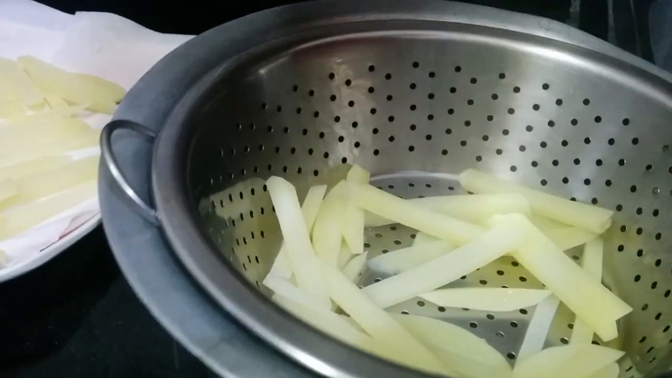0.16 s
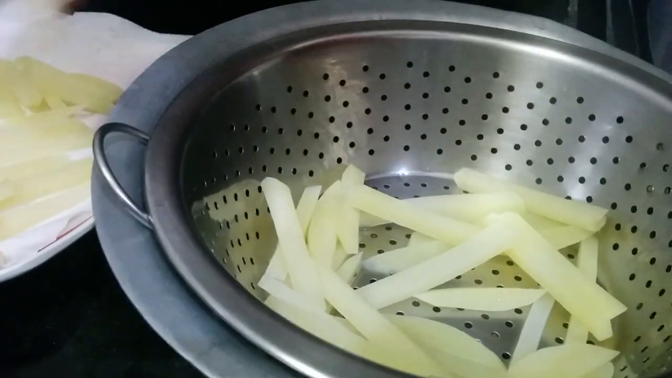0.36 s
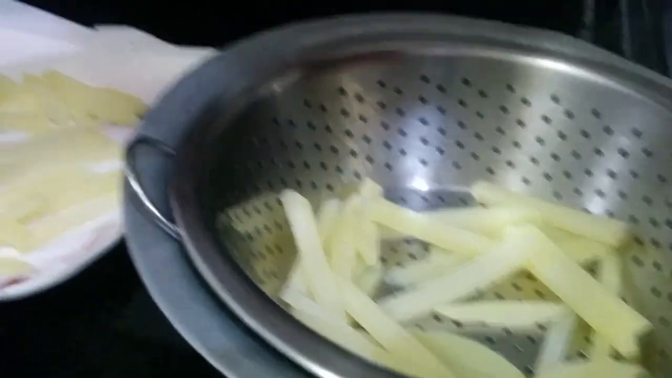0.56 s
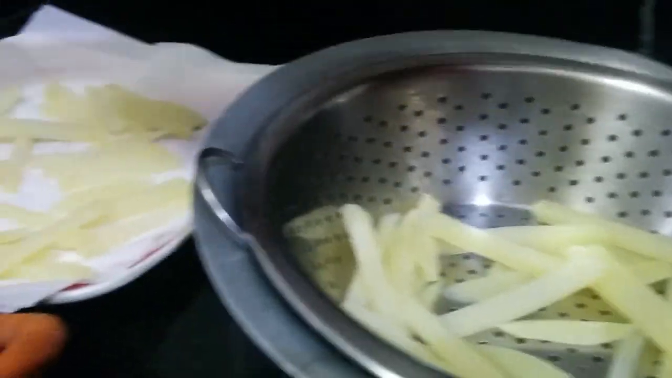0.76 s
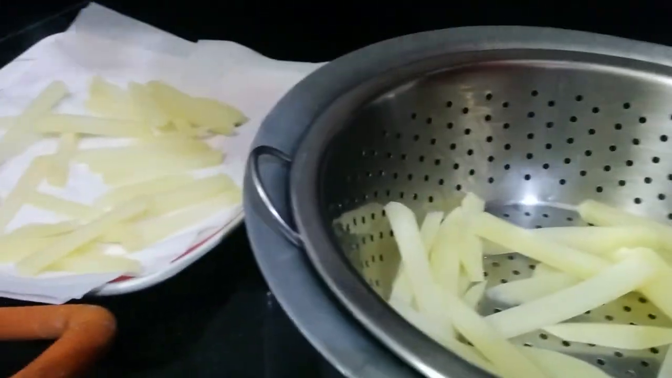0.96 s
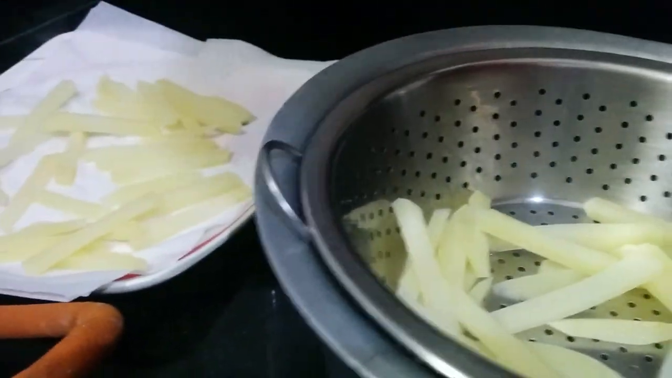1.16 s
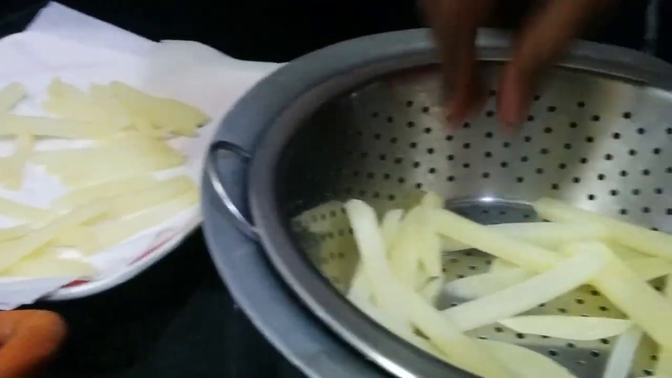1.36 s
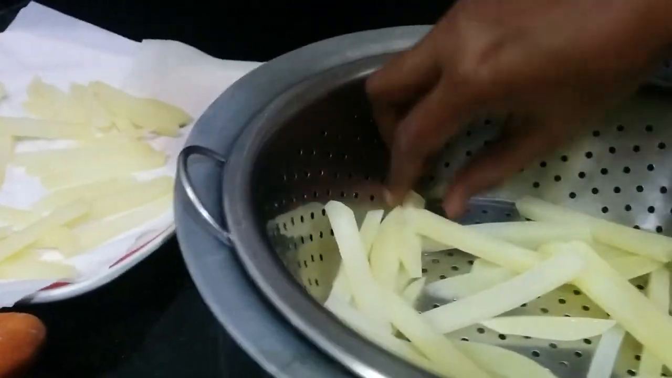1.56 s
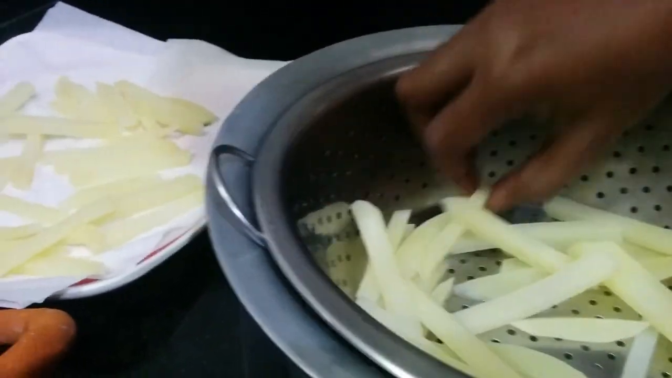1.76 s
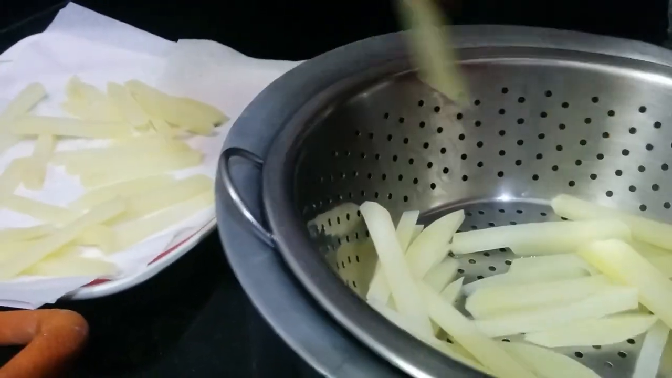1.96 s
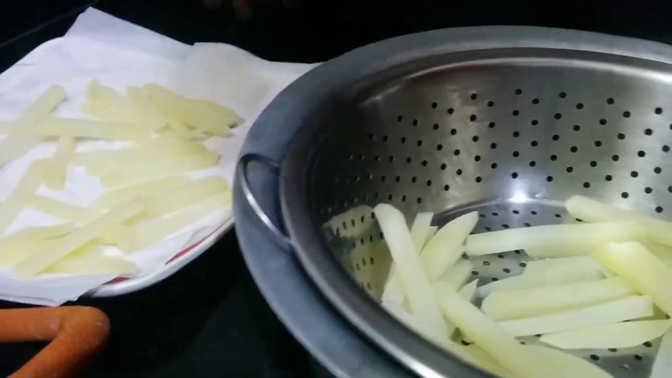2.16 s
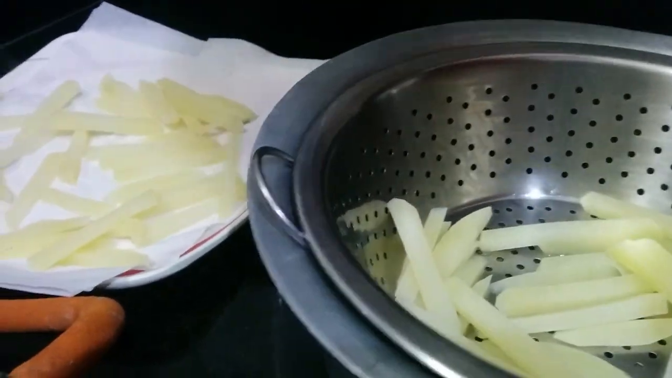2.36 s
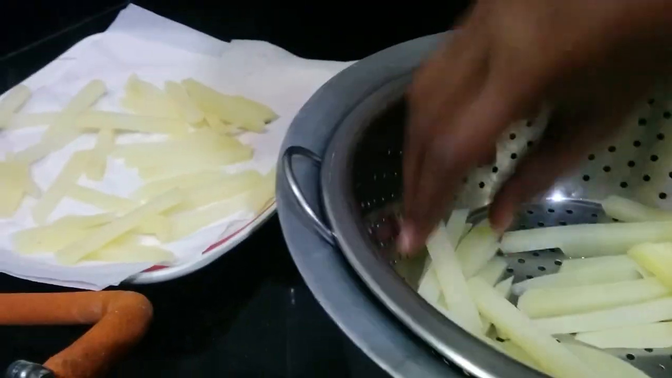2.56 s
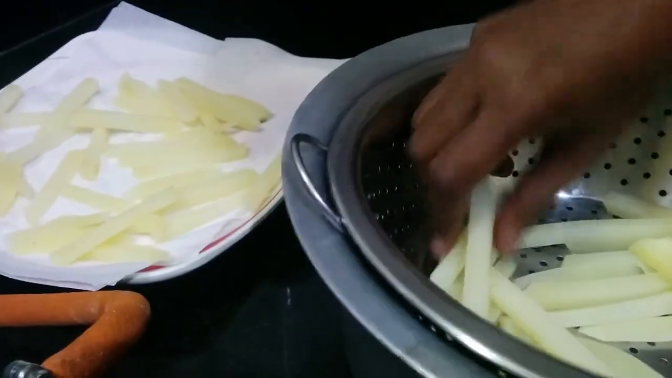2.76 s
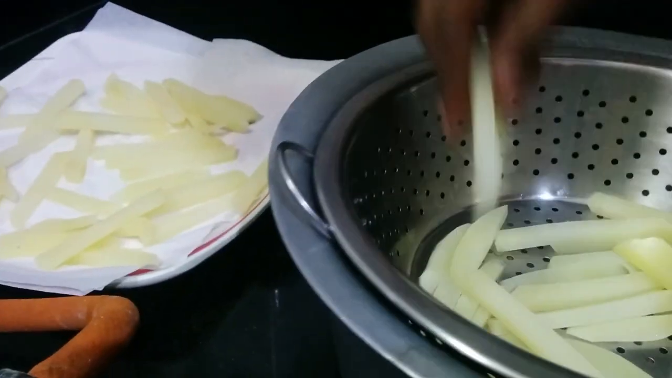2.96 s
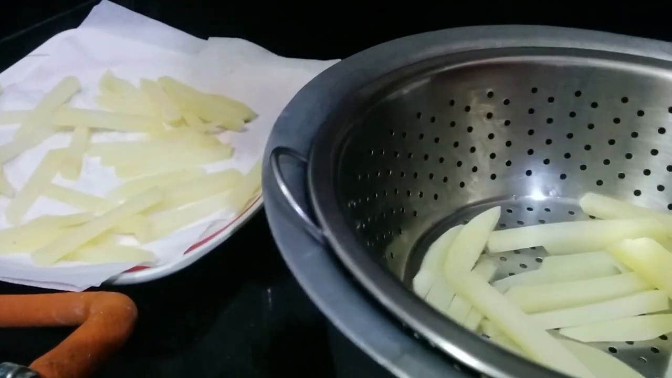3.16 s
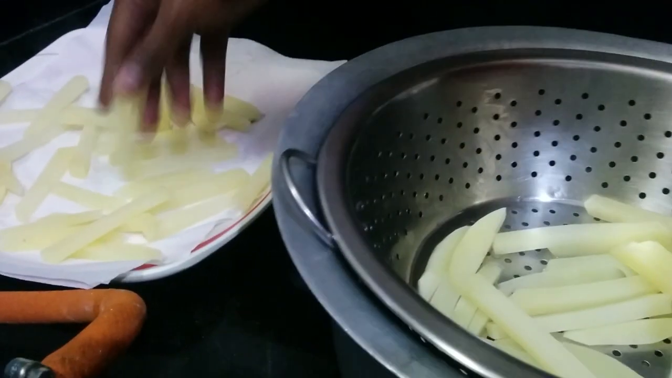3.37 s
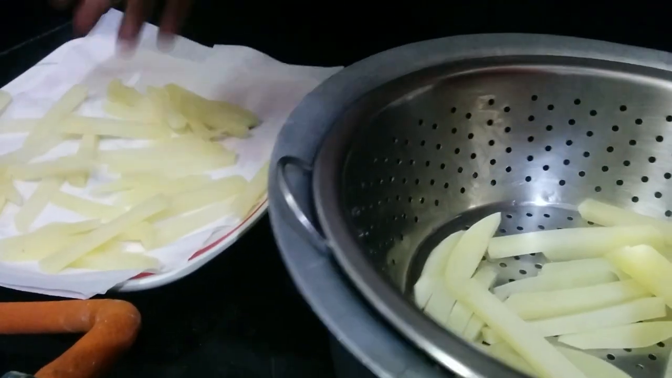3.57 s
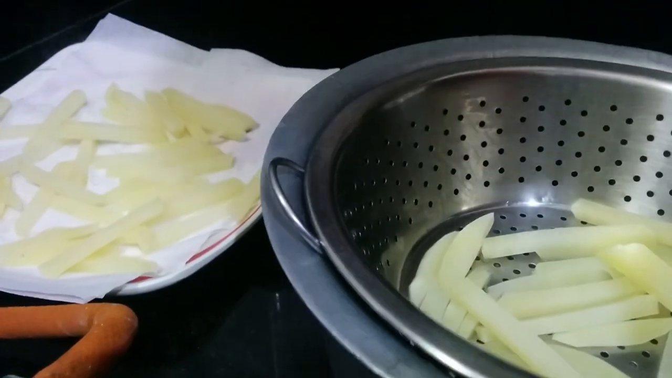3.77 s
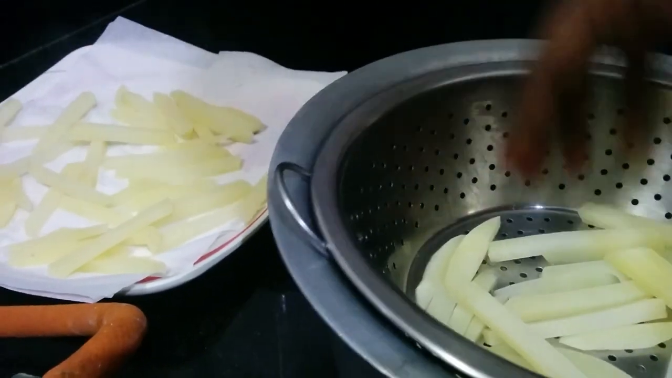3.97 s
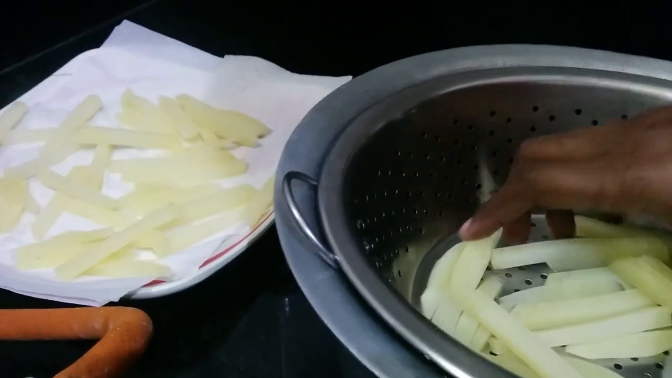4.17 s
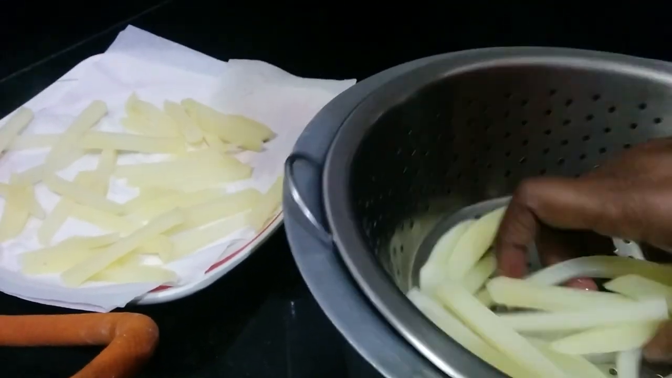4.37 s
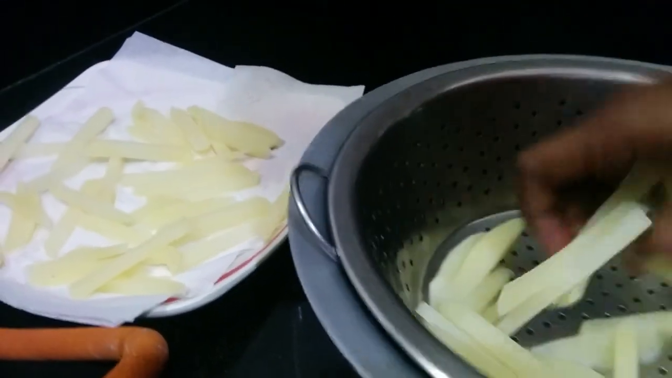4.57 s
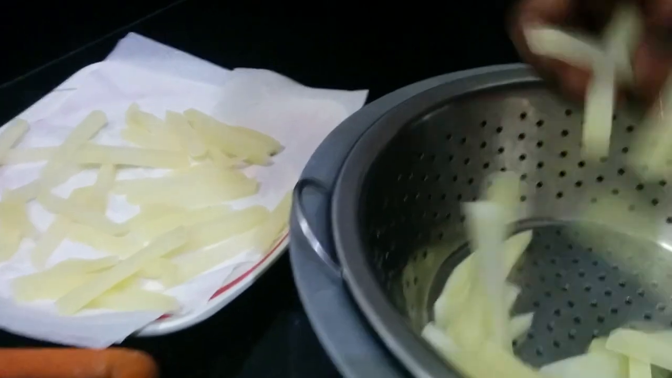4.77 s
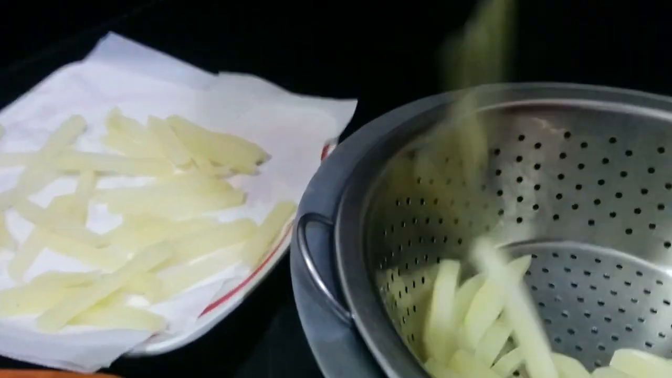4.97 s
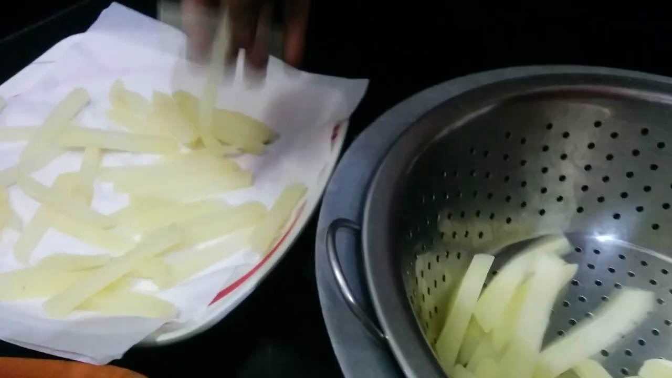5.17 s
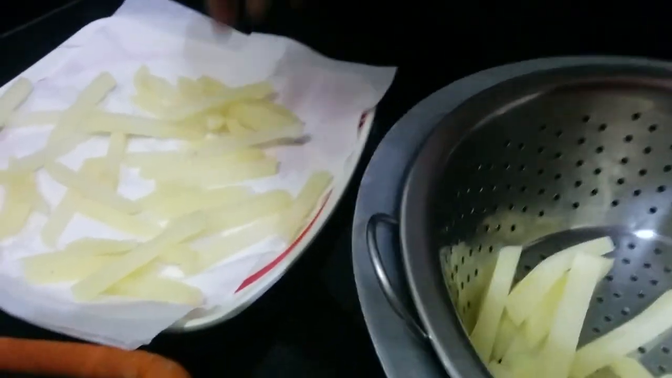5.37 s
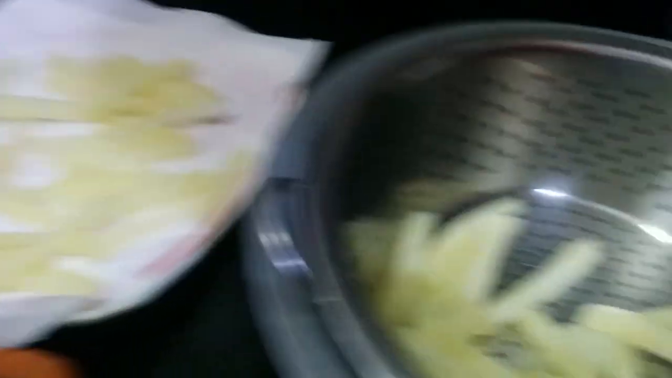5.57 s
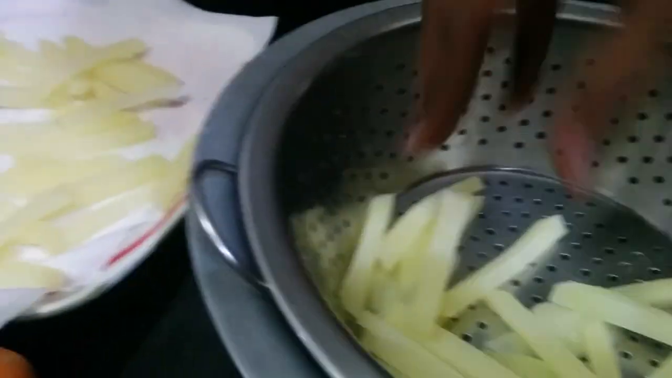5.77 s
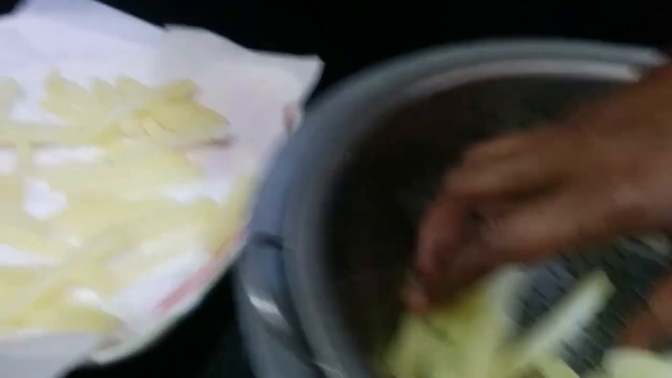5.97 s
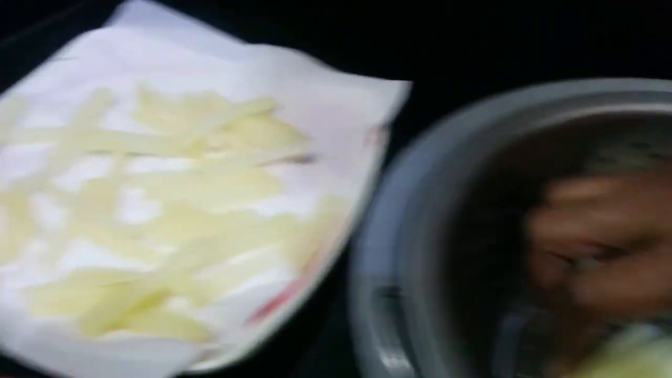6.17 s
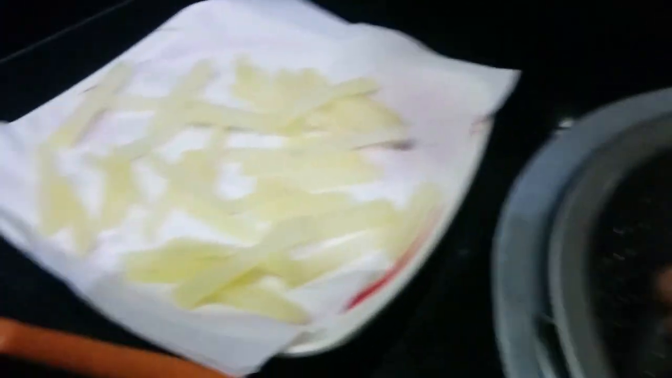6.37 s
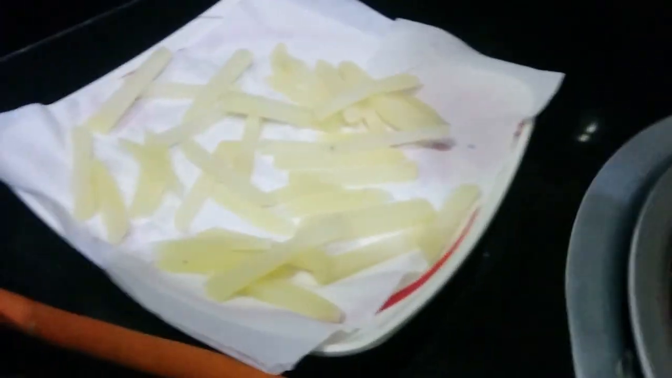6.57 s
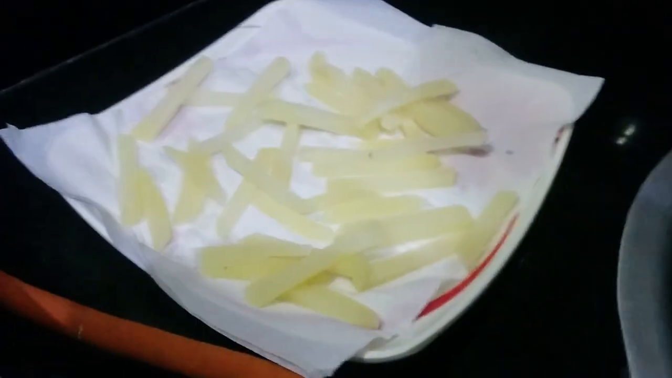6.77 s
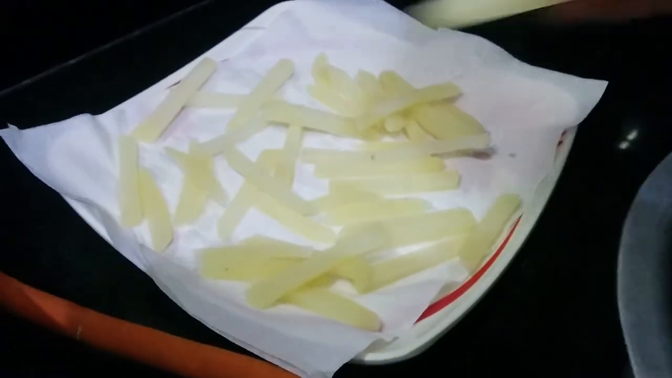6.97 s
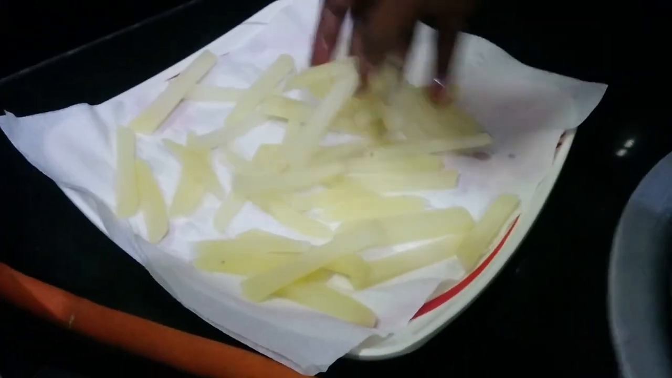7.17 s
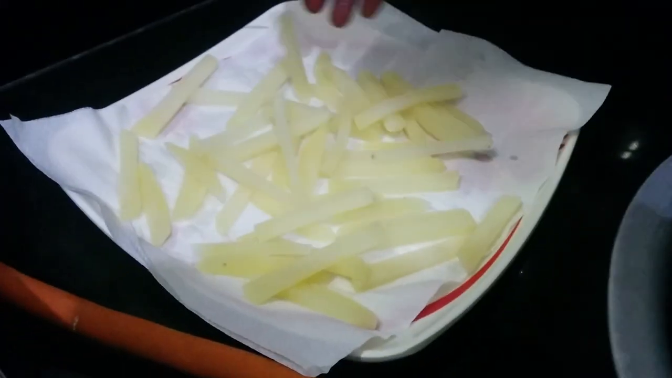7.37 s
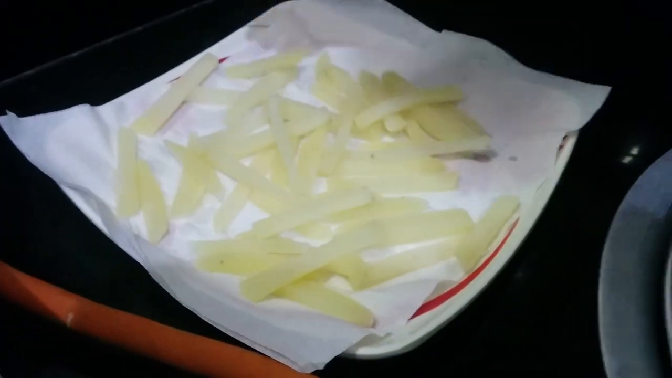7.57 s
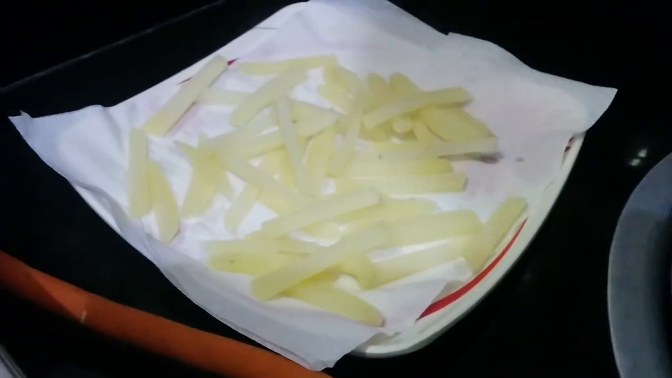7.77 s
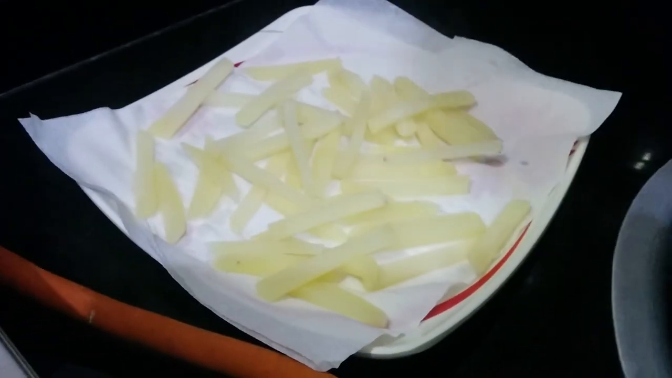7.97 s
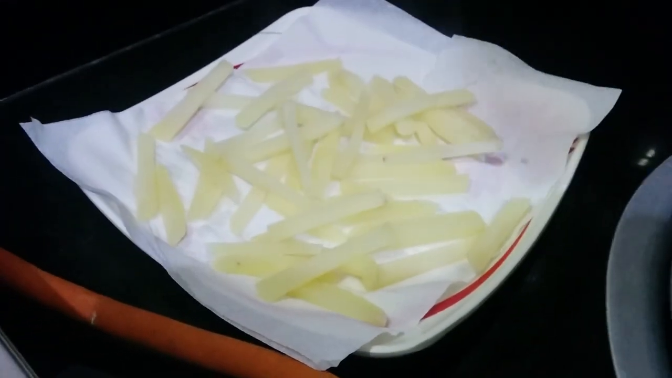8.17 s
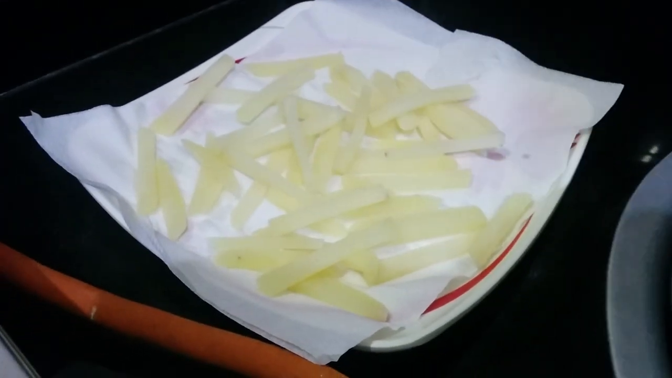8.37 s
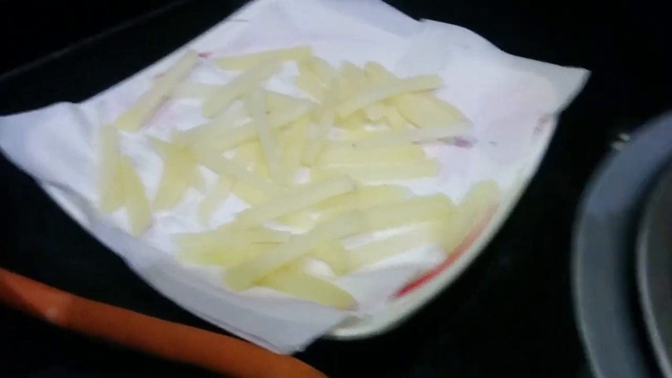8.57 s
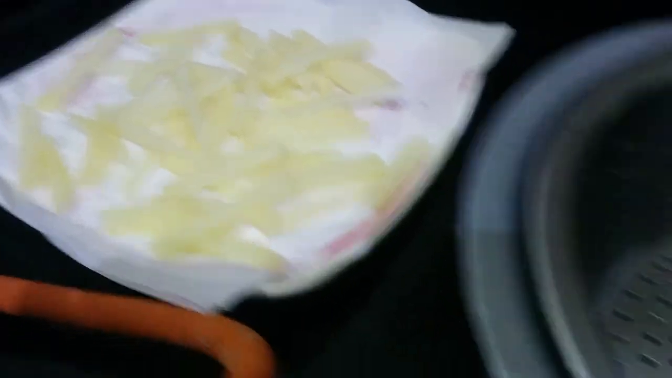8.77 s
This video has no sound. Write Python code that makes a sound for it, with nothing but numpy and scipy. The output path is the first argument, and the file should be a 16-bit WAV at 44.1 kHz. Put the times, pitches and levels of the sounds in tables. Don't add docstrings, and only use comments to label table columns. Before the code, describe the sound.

A quiet kitchen heard closely through a phone, its low, slowly beating motor hum, distant house murmur and faint cloth and tissue rustle pushed far down by noise suppression. At 0.6 s a potato stick lands very softly; small finger bumps and light steel ticks follow at 1.6-2.3 and 2.8 s. After near silence, light knocks at 4.2 s lead to the loudest sound, a bright steel slam at 4.37 s with a short clipped ring. Knocks, thuds and wet sliding over the holes run from 4.5 to 5.15 s, with a faint drop at 5.2. Clustered clinks come at 5.9 s, then drags and dull bumps until 6.9. At 7.2 s sticks plop dully on the tissue-lined plate, with small bumps after. Quiet until 8.45 s, when a scuff and second slam break into rapid knocks, fading by 8.8 s.

```python
import sys
import numpy as np
from scipy import signal
from scipy.fft import rfft, irfft
from scipy.io import wavfile
from scipy.ndimage import uniform_filter1d, minimum_filter1d

SR = 44100
rng = np.random.default_rng(int(sys.argv[2]) if len(sys.argv) > 2 else 0)


def invert_db(level):
    return 10 ** (np.asarray(level, dtype=float) / 20)


def file_out(sig):
    cols = np.atleast_2d(sig).T
    lim = np.clip(cols, -1, 1)
    pcm = np.round(lim * 32767).astype(np.int16)
    wavfile.write(sys.argv[1], SR, pcm)


N = 389403
HELD_DOWN_DB = 15.5


def rms_one(x):
    return x / np.sqrt(np.mean(x ** 2) + 1e-20)


def in_time(rows):
    s, *columns = np.transpose(rows)
    return [np.interp(np.arange(N) / SR, s, c) for c in columns]


def band(x, low_hz, high_hz):
    return signal.sosfilt(signal.butter(4, [low_hz, high_hz], "band", fs=SR, output="sos"), x)


def drift(rate_hz):
    r = np.exp(-80 * np.pi * rate_hz / SR)
    noise = rng.standard_normal(N // 40 + 2002)
    slow = signal.lfilter([1], [1, -2 * r, r * r], noise)[2000:]
    return np.interp(np.arange(N) / 40, np.arange(len(slow)), rms_one(slow))


def ring(force, hz, t60_s):
    r, w = invert_db(-60 / (max(t60_s, .01) * SR)), 2 * np.pi * hz / SR
    return signal.lfilter([0, np.sin(w)], [1, -2 * r * np.cos(w), r * r], force + 1e-18)


def resonance(grid_hz, hz, t60_s):
    turn, r = np.exp(-2j * np.pi * grid_hz / SR), invert_db(-60 / (t60_s * SR))
    poles = 1 - 2 * r * np.cos(2 * np.pi * hz / SR) * turn + (r * turn) ** 2
    return (1 - r * r) / 2 * (1 - turn ** 2) / poles


def patchy_noise(spectrum, patchy_db, rate_hz):
    out = 0
    hz, db = np.transpose(spectrum)
    white, together = rng.standard_normal((2, N)), drift(6.4)
    edges_hz = 22 * 2 ** np.arange(0, 9.6, 1 / 3)
    for k, (low, high) in enumerate(zip(edges_hz, edges_hz[1:])):
        level_db = np.interp(np.log(low * high) / 2, np.log(hz), db, left=-80, right=-80)
        if level_db > -70:
            third = signal.butter(2, [low, high], "band", fs=SR, output="sos")
            noise = signal.sosfilt(third, white[k % 2])
            flicker_db = patchy_db * (0.46 * together + drift(rate_hz))
            out = out + noise * invert_db(level_db + flicker_db)
    return rms_one(out)


# frequency in Hz, level in dB.
HISS_SPECTRUM = [(1180, -35), (2000, -6), (2280, 0), (2490, -3.5), (2710, -7), (14400, -12.5), (16000, -29)]


def hiss():
    return invert_db(-85) * patchy_noise(HISS_SPECTRUM, patchy_db=2.1, rate_hz=13.0)


# frequency in Hz, density in dB per Hz.
RUMBLE_SPECTRUM = [(20, -2.5), (50, -9), (80, 4), (110, -27)]


def rumble():
    return invert_db(-85.5) * patchy_noise(RUMBLE_SPECTRUM, patchy_db=3.5, rate_hz=4.0)


# frequency in Hz, density in dB per Hz.
MURMUR_SPECTRUM = [(76, -50), (130, -9), (232, -9.5), (301, -1), (387, -5), (418, -17.5), (503, -3.5),
                   (680, -16.5), (896, -6), (1460, -27), (1580, -18.5), (3000, -30.5), (3900, -55),
                   (6600, -120)]
# time in seconds, murmur in dB.
LIVELINESS_DB = [(0.0, -72), (0.65, -68.5), (1.29, -69.5), (1.62, -68.5), (1.86, -76.5), (2.25, -67),
                 (2.42, -68), (2.8, -68), (2.95, -73.5), (3.5, -69), (4.1, -67), (4.8, -69), (5.41, -76.5),
                 (5.65, -70), (7.1, -72.5), (7.4, -74), (8.24, -73.5), (8.83, -70)]


def murmur():
    level_db, = in_time(LIVELINESS_DB)
    return invert_db(level_db + 1.5) * patchy_noise(MURMUR_SPECTRUM, patchy_db=4.2, rate_hz=12.0)


# time in seconds, hum in dB.
HUM_DB = [(0.0, -73.5), (1.3, -73), (2.2, -78), (3.5, -72.5), (5.5, -78), (7.2, -79), (8.83, -73.5)]


def motors():
    hum_hz, beat_s, beat_null_s = 100, .888, .8
    t = np.arange(N) / SR
    hum_db, = in_time(HUM_DB)
    beat = np.sin(np.pi * (t - beat_null_s) / beat_s)
    wobble = invert_db(1.6 * drift(8.0))
    third_level = invert_db(-13.0 + 3.0 * drift(4.0))
    third = third_level * np.sin(2 * np.pi * 3 * hum_hz * t + 1.5 * drift(5.0))
    hum = beat * wobble * np.sin(2 * np.pi * hum_hz * t + 1.3 * drift(1.8))
    return invert_db(hum_db + 4.5) * (hum + third)


# middle in seconds, length
# in seconds, cloth in dB, tissue in dB.
ARM_REACHES = [(0.75, 0.37, -87, -93.5), (1.3, 0.68, -83, -95), (1.8, 0.22, -84, -83.5),
               (2.33, 0.58, -79.5, -88.5), (2.62, 0.079, -72.5, -78), (2.75, 0.24, -73, -83.5),
               (3.89, 0.14, -86, -94.5), (4.34, 0.13, -69, -75), (4.68, 0.13, -74.5, -81),
               (5.45, 0.31, -86.5, -92), (6.93, .2, -81.5, -88), (8.42, 0.059, -86, -84.5)]


def reaching():
    t = np.arange(N) / SR
    cloth, tissue = invert_db(-92.5), invert_db(-96)
    for s, length_s, cloth_db, tissue_db in ARM_REACHES:
        swell = np.exp(-(2 * (t - s) / length_s) ** 2)
        cloth = cloth + invert_db(cloth_db) * swell
        tissue = tissue + invert_db(tissue_db) * swell
    return cloth, tissue


# frequency in Hz, density in dB per Hz.
CLOTH_SPECTRUM = [(1200, -22), (1900, -14), (2300, 11.5), (2800, -2.5), (3500, -16.5), (5000, -34)]
# frequency in Hz, density in dB per Hz.
TISSUE_SPECTRUM = [(4000, -11), (6500, -8.5), (8500, -0.5), (11000, -9.5), (14000, -25.5)]
# frequency in Hz, level in dB, t60 in seconds.
COLANDER_MODES = [(128, -16, .15), (283, -6, .12), (352, -4, .12), (388, 0, .15), (474, -5, .12),
                  (694, -9, .08), (750, -8, .08), (1085, 0, .09), (1150, 0, .07), (1300, -13, .06),
                  (1720, -15, .07), (2155, -7, .07), (2275, 0, .11), (2417, -8, .06), (2680, -1, .09),
                  (2982, -11, .05), (3300, -15, .05), (3930, -4, .07), (4105, 0, .09), (4400, -3, .06),
                  (4540, -3, .06), (4840, -4, .07), (5134, -5, .06), (5330, -7, .05), (6050, -15, .05),
                  (6450, -15, .05), (7640, -6, .03), (7950, -6, .03), (9600, -6, .03)]


def rustling():
    cloth_gain, tissue_gain = reaching()
    rustle = patchy_noise(CLOTH_SPECTRUM, patchy_db=3.0, rate_hz=15.0)
    sings = sum(invert_db(db + 4 * drift(5)) * ring(rustle, hz, t60_s)
                for hz, db, t60_s in COLANDER_MODES[11:16])
    cloth = cloth_gain * invert_db(-3.5) * (rustle + invert_db(-5.5) * rms_one(sings))
    tissue = tissue_gain * invert_db(-1.5) * patchy_noise(TISSUE_SPECTRUM, patchy_db=.6, rate_hz=15.0)
    return cloth + tissue


def kitchen():
    return murmur() + rustling() + rumble() + motors() + hiss()


# low edge in Hz, high edge in Hz.
BODY_ZONES_HZ = [(700, 1600), (110, 700), (1600, 3500), (3500, 6500), (6500, 15500)]
ZONE_TAILS_S = [0.36, 0.28, 0.38, 0.28, 0.23]


def struck(hits, modes, contact_s, damping, fill_db, rattle_db, favour_hz, favour_db, luck_db=3.5):
    size, kept = 3 * 2 ** 13, 2 ** 14
    out, t = np.zeros(N + size), np.arange(size) / SR
    grid_hz = np.arange(size // 2 + 1) * SR / size
    hz, db, t60_s = np.transpose(modes)[:, :, None]
    db = db + favour_db * np.exp(-(np.log(hz / favour_hz) / .045) ** 2)
    crowd = invert_db(fill_db + 8) * resonance(grid_hz, hz, t60_s / 4)
    rings = invert_db(db) * (resonance(grid_hz, hz, .7 * t60_s) + crowd)
    rise = np.minimum(t / contact_s, 1) ** 2
    for s, *zone_db in hits:
        luck = invert_db(luck_db * rng.standard_normal(len(modes)))
        noise = rng.standard_normal(size)
        noise[round(contact_s * SR)] = 7.5
        at = round((s - 0.69 * contact_s) * SR)
        for (low, high), level_db, tail_s in zip(BODY_ZONES_HZ, zone_db, ZONE_TAILS_S):
            burst = invert_db(-60 * t / (.3 * damping * tail_s))
            rattle = invert_db(rattle_db - 60 * t / (damping * tail_s))
            force = rise * (burst + rattle)
            inside = (low <= hz[:, 0]) & (hz[:, 0] < high)
            body = luck[inside] @ rings[inside] + invert_db(-3 if low > 6000 else -33)
            driven = irfft(rfft(force * noise) * body)[:kept]
            blow = band(driven, 0.97 * low, 1.03 * high)
            peak = np.sqrt(np.max(uniform_filter1d(blow ** 2, size=400)))
            out[at:at + kept] += invert_db(level_db - 7.5) * blow / peak
    return signal.sosfilt(signal.butter(2, 10500, fs=SR, output="sos"), out[:N])


# frequency in Hz, level in dB, t60 in seconds.
PLATE_MODES = [(340, -2, .06), (510, 0, .07), (640, -4, .05), (800, -4, .05), (930, -5, .05),
               (1330, -1, .04), (1545, -4, .04), (1900, -4, .03), (2320, -2, .03), (2800, -7, .03)]
# time in seconds, strength in dB, weight on the plate in dB, slap in dB.
STICK_DROPS = [
    (0.634, -43.5, 1.5, 0.5),
    (5.232, -40.5, 10, -9),
    (7.173, -26, 3.5, -8.5),
    (7.197, -42.5, 13.5, -14),
    (7.221, -47, 7, 1.5),
    (7.257, -53.5, 24, 3),
]


def drops():
    hits = [(s, db, db + weight, db + slap, db + slap - 33.5, db - 80)
            for s, db, weight, slap in STICK_DROPS]
    return struck(hits, PLATE_MODES, contact_s=.002, damping=1.2, fill_db=-7.0, rattle_db=-9.5,
                  favour_hz=520, favour_db=3.0)


# start in seconds, length in seconds, pressure in dB, brightness in dB.
STICK_SLIDES = [
    (4.178, 0.025, -61, 2.5),
    (4.81, 0.065, -43, -32),
    (4.87, 0.15, -52.5, -1.5),
    (4.993, .17, -44, -21),
    (6.018, 0.091, -48, -21),
    (6.158, 0.051, -48, -22),
    (6.272, .05, -51, -23),
]


def sliding():
    attack_s, fade_db, release_s = 0.017, -11, 0.024
    t, dull, bright = np.arange(N) / SR, 0, 0
    for s, length_s, db, bright_db in STICK_SLIDES:
        corners_s = s + np.cumsum([0, attack_s, length_s, release_s])
        stroke = np.interp(t, corners_s, [0, 1, invert_db(fade_db), 0])
        dull = dull + invert_db(db) * stroke
        bright = bright + invert_db(db + bright_db) * stroke
    caught = rng.random(N) < 900 / SR
    catches = caught * invert_db(2.0 * rng.exponential(1, N)) * rng.choice([-1, 1], N)
    steel = sum(invert_db(db) * ring(catches, hz, 0.3 * t60_s) for hz, db, t60_s in COLANDER_MODES)
    steel = rms_one(steel) + .5 * rms_one(catches)
    low = dull * invert_db(2.0) * rms_one(band(steel, 100, 1600))
    high = bright * invert_db(7.0) * rms_one(band(steel, 1600, 5600))
    return low + high


# time in seconds, strength in dB, weight on the bowl in dB,
# knuckle in dB, nail edge in dB.
SOFT_BUMPS = [(1.595, -50, 15.5, 1.5, -29), (2.073, -82.5, 46, 6, 7), (2.255, -46, 3, -3, -25),
              (4.555, -54, 0.5, -31, -0.5), (4.843, -33.5, 3, -9.5, -45), (4.898, -46, -10, 17.5, -5),
              (4.954, -41.5, 8.5, -5, -22), (4.995, -30.5, -2, -5, -15.5), (5.007, -30.5, 8.5, -5.5, -19),
              (5.144, -50.5, 21.5, -21, -26), (5.903, -31.5, -9.5, -6.5, -11.5),
              (6.024, -39.5, -9, 0.5, -21), (6.139, -35.5, -4, -2, -49.5), (6.168, -35.5, -18.5, -17, -38),
              (6.255, -36, -16.5, -7, -22.5), (6.38, -36, -32, -11, -33), (6.453, -36.5, -36, -10, -26.5),
              (6.619, -35.5, -23, -7, -36.5), (6.832, -34.5, -19, -9.5, -37.5),
              (6.923, -33, -7, -15.5, -50), (7.307, -35, -26, -16, -30), (7.556, -48.5, -15.5, -21.5, -49),
              (8.55, -27.5, 1, -4.5, -17), (8.693, -37.5, 1, -3, -20)]


def bumps():
    hits = [(s, db, db + weight, db + knuckle, db + edge, db - 28.0 + 0.63 * edge)
            for s, db, weight, knuckle, edge in SOFT_BUMPS]
    return struck(hits, COLANDER_MODES, contact_s=.007, damping=.75, fill_db=-18.0, rattle_db=-14.0,
                  favour_hz=1165, favour_db=6.0)


def hard_zones(hits, flank_db):
    return [(s, db + soft, db + weight, db + flank_db + 0.34 * soft, db, db + snap)
            for s, db, weight, soft, snap in hits]


# time in seconds, strength in dB, weight on the bowl in dB,
# softness in dB, snap in dB.
HANDLE_SCUFFS = [
    (3.894, -61, -11, 7, -25),
    (4.242, -49, -21, -11.5, -4),
    (8.44, -27, -24.5, -5.5, 1.5),
    (8.781, -41.5, -28, -4, -8),
]


def scuffs():
    return struck(hard_zones(HANDLE_SCUFFS, flank_db=8), COLANDER_MODES, contact_s=0.0033, damping=1.0,
                  fill_db=-1.5, rattle_db=-7.5, favour_hz=3000, favour_db=16.5)


# time in seconds, strength in dB, weight on the bowl in dB,
# softness in dB, snap in dB.
FOOT_SLAMS = [
    (4.366, -11, -0.5, -19, -6),
    (8.464, -18.5, 3, -10, -3.5),
    (8.739, -46.5, -8, 4, -5),
]


def slams():
    return struck(hard_zones(FOOT_SLAMS, flank_db=-2), COLANDER_MODES, contact_s=.002, damping=1.2,
                  fill_db=-14.0, rattle_db=-11.0, favour_hz=4080, favour_db=7.0, luck_db=.8)


# time in seconds, strength in dB, weight on the bowl in dB,
# softness in dB, snap in dB.
COLANDER_KNOCKS = [(1.628, -41, -10, -3.5, -14.5), (1.803, -39, -22, -3, -15), (2.799, -42.5, -49, -1, -27),
                   (4.19, -36.5, -3.5, 2, 1), (4.218, -34.5, -33, -12, -3), (4.495, -27, -5, -8.5, -2),
                   (4.582, -34.5, -35, 0, -14), (4.892, -33.5, -25, -3, -41), (5.071, -46.5, 4.5, 2, -28),
                   (5.104, -44, 10.5, -21.5, -25), (5.888, -36, -6.5, -23, -20.5),
                   (5.922, -28, -10.5, -4.5, -7.5), (5.946, -30.5, -5.5, -11, -10),
                   (5.967, -34.5, -12, -17, -20), (6.113, -46, -3, 3.5, -32), (6.247, -46.5, -1, 8, -28),
                   (6.472, -31, -11.5, -12.5, -6.5), (6.517, -34, -6.5, -13.5, -15.5),
                   (8.572, -17, -8, -8.5, -2.5), (8.6, -23.5, -6, -5, -3.5), (8.644, -26, -11, -8.5, -6)]


def knocks():
    return struck(hard_zones(COLANDER_KNOCKS, flank_db=-2.5), COLANDER_MODES, contact_s=.002, damping=.95,
                  fill_db=-10.0, rattle_db=-10.5, favour_hz=4500, favour_db=4.0)


def scene():
    room = invert_db(HELD_DOWN_DB) * kitchen()
    steel = knocks() + slams() + scuffs() + bumps() + sliding()
    return (steel + drops() + room)[None]


def suppress(x, margin_db, slope, wide_share):
    hz, t, spectrum = signal.stft(x, SR, nperseg=512, noverlap=384)
    power = uniform_filter1d(np.abs(spectrum) ** 2, size=13, axis=0)
    power = uniform_filter1d(power, size=3, axis=1)
    level_db = 10 * np.log10(power + 1e-16)
    above_db = level_db - np.median(level_db, axis=1, keepdims=True)
    wide_db = np.mean(above_db[4:62], axis=0)
    wide_held_db = -minimum_filter1d(-wide_db, size=7, origin=3)
    above_db = (1 - wide_share) * above_db + wide_share * wide_held_db
    gain_db = np.clip(slope * (above_db - margin_db), -HELD_DOWN_DB, 0)
    return signal.istft(spectrum * invert_db(gain_db), SR, nperseg=512, noverlap=384)[1][:N]


def band_limit(x):
    return signal.sosfilt(signal.butter(12, 16810, fs=SR, output="sos"), x)


def record(dry):
    quiet = suppress(dry[0], margin_db=14.5, slope=2.2, wide_share=0.81)
    top_cut = signal.cheby2(12, 35, 16200, fs=SR, output="sos")
    finished = signal.sosfilt(top_cut, quiet)[None]
    return band_limit(finished)


dry = scene()
out = record(dry)
file_out(out)
```